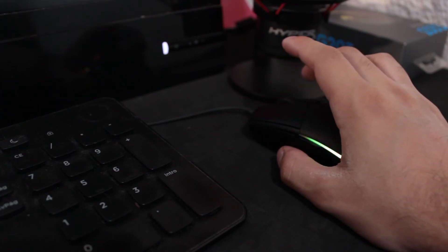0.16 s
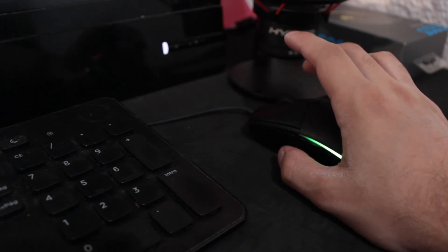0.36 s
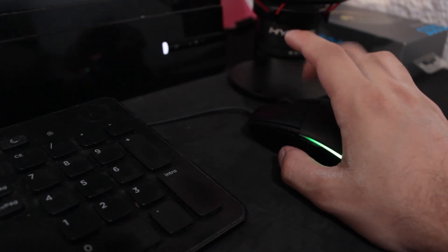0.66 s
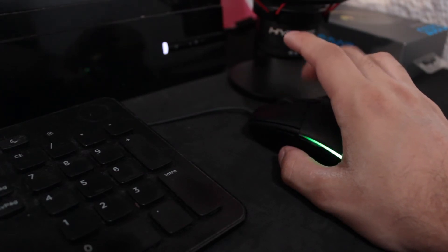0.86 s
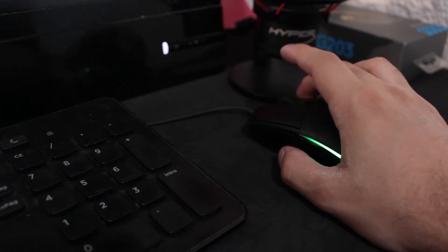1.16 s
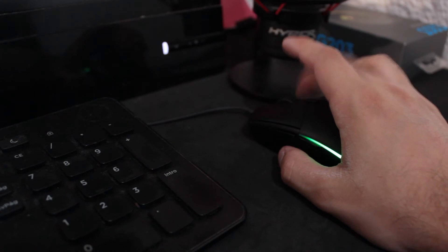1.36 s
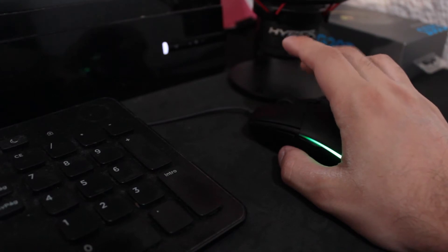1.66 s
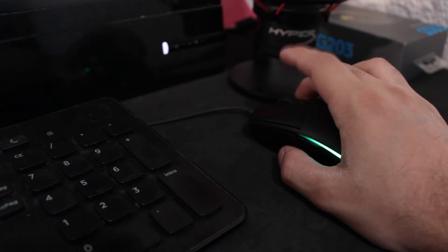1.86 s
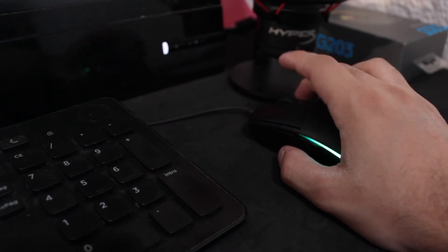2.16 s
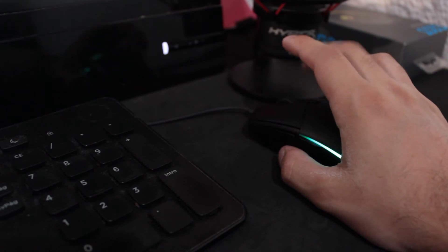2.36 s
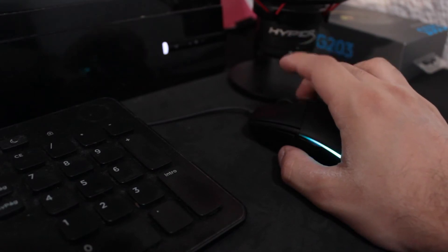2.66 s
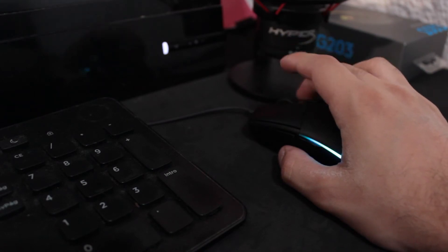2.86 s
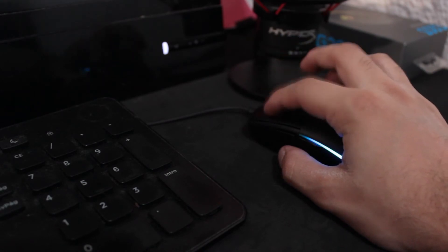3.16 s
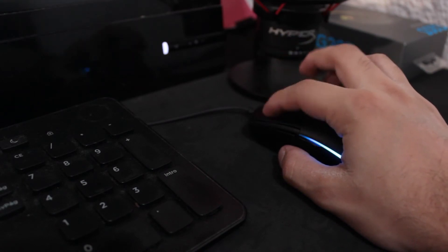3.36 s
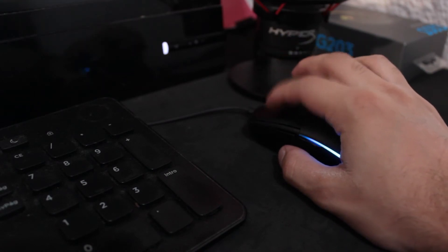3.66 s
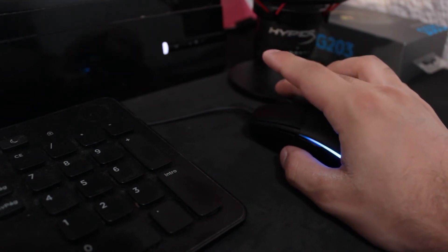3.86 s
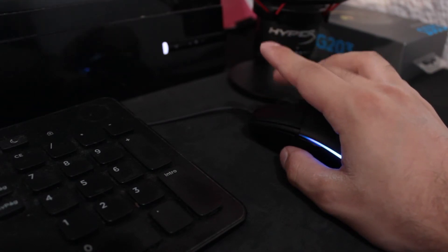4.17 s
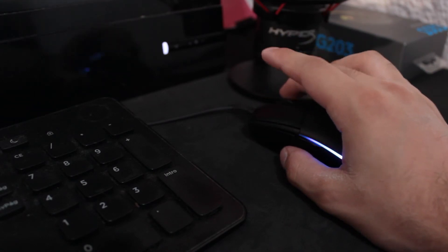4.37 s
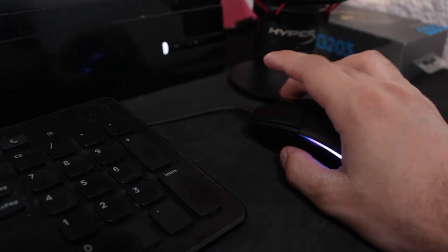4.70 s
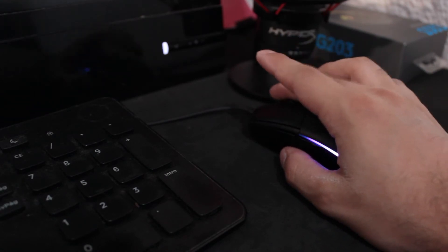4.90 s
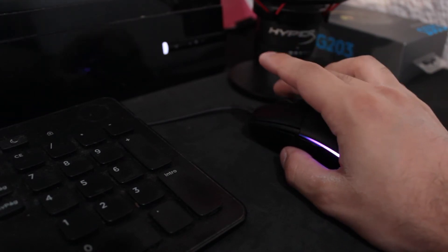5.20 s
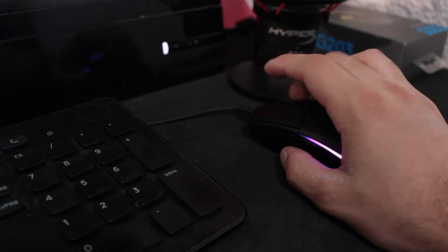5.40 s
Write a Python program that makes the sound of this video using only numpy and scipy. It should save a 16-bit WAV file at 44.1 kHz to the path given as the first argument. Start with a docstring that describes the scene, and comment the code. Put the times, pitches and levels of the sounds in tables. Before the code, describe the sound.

Computer fans give a faint, steady hum and hiss in a small room while a finger clicks a mouse on a desk, close to the microphone. Single crisp press-and-release clicks lead into a quicker run, the last three lighter and slightly different in tone. Then the clicking ends, leaving soft taps and slips of the hand on the mouse as a thin fan whine briefly swells.

```python
"""Mouse buttons tapped on a desk, first the right, then the left, close to a small microphone.
Each press snaps a spring switch and thumps the shell on the desk; each release lets the spring ring free.
The hand adds a few knocks, ticks and slips of skin. Behind it computer fans hum and hiss,
their whine flaring briefly near the end, and a small room answers the clicks."""
import sys
import numpy as np
from scipy import signal
from scipy.fft import rfft, irfft
from scipy.io import wavfile
from scipy.ndimage import uniform_filter1d

SR = 44100
rng = np.random.default_rng(int(sys.argv[2]) if len(sys.argv) > 2 else 0)


def to_wav(s):
    """Save 16-bit WAV."""
    ch = np.atleast_2d(s).T  # columns
    pcm = np.round(np.clip(ch, -1, 1) * 32767)  # PCM
    wavfile.write(sys.argv[1], SR, pcm.astype(np.int16))


N = 244303
LEFT_FROM_S = 3.1  # the finger moves to the left button

# contact noise of the right button: frequency_hz, density_db
RIGHT_CONTACT = [(710, -25), (1200, -8), (2550, -5.5), (3690, -1.5), (4910, -6.5), (7430, -3.5),
                 (8750, -13.5), (10100, -12.5), (13500, -26), (15300, -41), (16300, -46)]


def gain_of(db):
    """Decibels to amplitude."""
    return 10 ** (np.asarray(db) / 20)


def unit_rms(x):
    """Scales to rms 1."""
    return x / np.sqrt(np.mean(x ** 2) + 1e-20)


def unit_peak(x):
    """Scales to peak 1."""
    return x / abs(x).max()


def curve_at(points, hz):
    """Reads a table on a log-frequency axis."""
    point_hz, value = np.transpose(points)
    return np.interp(np.log(hz + 1), np.log(point_hz + 1), value)


def add(mix, start_s, sound):
    """Mixes a sound in at start_s, cutting what falls outside."""
    at = round(start_s * SR)
    sound = sound[max(-at, 0):]
    part = mix[max(at, 0):][:len(sound)]
    part += sound[:len(part)]


def ring(modes, length_s, rise_s):
    """One dying sine a mode, taking a moment to build; peak 1."""
    t = np.arange(round(length_s * SR)) / SR
    hz, db, t60 = np.transpose(modes)[:, :, None]
    sines = gain_of(db - 60 * t / t60) * np.sin(2 * np.pi * hz * t)
    return unit_peak(sines.sum(0) * (1 - np.exp(-t / rise_s)))


def coloured_noise(spectrum, size):
    """Noise with the given spectrum; rms 1."""
    hz = np.fft.rfftfreq(size, 1 / SR)
    return unit_rms(irfft(rfft(rng.standard_normal(size)) * gain_of(curve_at(spectrum, hz)), size))


def small_room(x, wet_db, thin_hz):
    """Direct sound, echoes off near surfaces, and a short tail that thins out below thin_hz."""
    # surfaces near the microphone: delay_s, level_db
    echoes = [(.0013, -11.5), (.0024, -6), (.0052, -15), (.0075, -21.5)]
    # decay of the room: frequency_hz, t60_s
    decay = [(250, .2), (660, .18), (1740, .18), (4590, .19), (12100, .14)]
    taps = np.zeros(SR // 2)
    at = np.arange(200, len(taps) - 16, 12)
    taps[at + rng.integers(0, 12, len(at))] = rng.choice([-1., 1.], len(at))
    hz, t, bands = signal.stft(taps, SR, nperseg=256)
    fade = gain_of(-60 * t / curve_at(decay, hz)[:, None])
    bass_loss = hz ** 2 / (hz ** 2 + thin_hz ** 2)
    tail = signal.istft(bands * fade * bass_loss[:, None], SR, nperseg=256)[1]
    tail *= 1 - np.exp(-np.arange(len(tail)) / SR / 0.0061)  # the tail builds up
    response = tail * gain_of(wet_db) / np.linalg.norm(tail)
    response[0] += 1  # direct sound
    for delay_s, db in echoes:
        add(response, delay_s, gain_of([db]))
    return signal.oaconvolve(x, response)[:len(x)]


def fan_tone(hz, db, width_hz):
    """A blade or motor tone: its wandering phase spreads it over width_hz, and its level drifts."""
    hop = 64
    wander, drift = rng.standard_normal((2, N // hop + 2))
    phase = np.cumsum(wander) * np.sqrt(2 * np.pi * width_hz * hop / SR)
    drift_db = 1.67 * unit_rms(uniform_filter1d(drift, size=60))
    phase, drift_db = (np.interp(np.arange(N) / hop, np.arange(len(c)), c) for c in (phase, drift_db))
    return np.sqrt(2) * gain_of(db + drift_db) * np.sin(2 * np.pi * hz * np.arange(N) / SR + phase)


def fan_whine():
    """The strongest fan tone, slowly swelling and sinking."""
    # course of the whine: time_s, level_db
    levels = [(0.0, -56), (0.55, -50.5), (1.1, -54.5), (2.4, -55), (3.8, -57), (5.09, -50.5), (5.54, -55)]
    level_db = np.interp(np.arange(N) / SR, *np.transpose(levels))
    return fan_tone(hz=835, db=level_db, width_hz=3.34)


def fans():
    """Computer fans in the background: air rushing in drifting patches, with blade and motor tones."""
    # rushing air: frequency_hz, density_db
    air = [(18, -50), (30, 0.5), (98, -12.5), (158, -14.5), (190, -50), (222, -7.5), (517, -12), (559, -5),
           (605, -8.5), (852, -9.5), (922, -11.5), (1110, -11.5), (1980, -19.5), (9630, -36), (16300, -51)]
    # blade and motor tones: pitch_hz, rms_db, width_hz
    hum = [(140.8, -61, 14.5), (163, -61, 10.1), (225.4, -52.5, 3.52), (255, -59, 9.76), (314.3, -61, 8.7),
           (556.3, -57.5, 6.48), (660, -63.5, 8.4), (1006, -78, 13), (1117, -62, 3.5), (1240, -63.5, 3.9),
           (1423, -66.5, 3.6), (1810, -78, 3.8), (1832, -65.5, 3.7), (2690, -64, 67.3), (3430, -69, 60),
           (4330, -73.5, 28.8), (4920, -77, 57.5), (6670, -77.5, 29), (9370, -75, 120)]
    frames, hz = N // 512 + 5, np.fft.rfftfreq(2048, 1 / SR)
    real, imag, patches = rng.standard_normal((frames, len(hz), 3)).T
    patches_db = unit_rms(uniform_filter1d(uniform_filter1d(patches, size=20, axis=0), size=6, axis=1))
    swell_db = .25 * unit_rms(uniform_filter1d(rng.standard_normal(frames), size=30))
    bands = (real + 1j * imag) * gain_of(curve_at(air, hz)[:, None] + patches_db + swell_db)
    rush = unit_rms(signal.istft(bands, nperseg=2048, noverlap=1536)[1][:N])
    return gain_of(-47) * rush + sum(fan_tone(*row) for row in hum)


def skin_rustle():
    """The hand shifts on shell and mat: each slip swells and dies in fine, uneven grains."""
    # slips of the hand: peak_s, level_db
    slips = [(4.11, -64), (4.81, -51), (5.03, -50), (5.19, -48), (5.45, -47.5)]
    # skin friction: frequency_hz, density_db
    friction = [(250, -30), (500, -3), (900, 4), (1800, -9.5), (4000, -14), (8000, -29), (13000, -34),
                (16000, -50)]
    fade_db_per_s = 155
    t = np.arange(N) / SR
    envelope = sum(gain_of(db - fade_db_per_s * abs(t - peak_s)) for peak_s, db in slips)
    grains = gain_of(4.1 * unit_rms(uniform_filter1d(rng.standard_normal(N), size=250)))
    return envelope * unit_rms(grains * coloured_noise(friction, N))


def knocks_and_flares():
    """Hand knocks and ticks, and brief flares of the fan whine: each a pitch with two weaker neighbours."""
    # soft knocks and brief flares of the fan whine: start_s, level_db, pitch_hz, t60_s
    short_rings = [(1.795, -26, 1170, 0.02), (4.112, -32, 830, 0.011), (4.811, -37, 680, 0.046),
                   (5.008, -31.5, 830, 0.035), (5.034, -31, 810, 0.014), (5.167, -35, 845, 0.071),
                   (5.201, -35.5, 890, 0.027), (5.444, -35, 584, 0.024)]
    # faint ticks: start_s, level_db, pitch_hz
    ticks = [(1.797, -33.5, 3620), (4.113, -37, 2620), (4.992, -43, 6860), (5.021, -49, 7060),
             (5.182, -52, 11800), (5.44, -54, 11600)]
    out = np.zeros(N)
    for start_s, db, hz, t60 in short_rings:
        modes = [(hz, 0, t60), (1.41 * hz, -5, t60 / 2), (0.77 * hz, -5, t60 / 2)]
        add(out, start_s, gain_of(db) * ring(modes, length_s=.08, rise_s=0.00023))
    for start_s, db, hz in ticks:
        modes = [(hz, 0, .006), (1.2 * hz, -4, .004), (.8 * hz, -5, .004)]
        add(out, start_s, gain_of(db) * ring(modes, length_s=.02, rise_s=0.00024))
    return small_room(out, wet_db=-5, thin_hz=300)


def desk_ring():
    """Desk and nook ring on after a thump; each blow wakes the modes by different amounts."""
    # modes of desk and nook: pitch_hz, level_db, t60_s
    desk_modes = [(126, -3, .07), (143, -11, .15), (404, -4, .13), (445, -14, .13), (520, -16, .1),
                  (625, -13, .13), (657, -8, .14), (745, -13, .14), (823, -5.5, .19), (897, -6.5, .18),
                  (990, -12, .12), (1090, -20, .15), (1335, -14, .15), (1518, -7, .11), (1650, -9, .07),
                  (1773, -11, .17), (1835, -13, .2), (1904, -9, .2), (2020, -10, .1), (2150, -2, .1),
                  (2299, -5, .16), (2428, -9, .16), (2523, -12, .18), (2570, -12, .18), (2741, -9, .13),
                  (2925, -12, .11), (3025, -13, .12), (3355, -11, .13), (3467, -10, .14)]
    struck = np.array(desk_modes)
    struck[:, 1] += 1.2 * rng.standard_normal(len(struck))
    return ring(struck, length_s=.4, rise_s=0.0051)


def late_ring():
    """A short ring that swells after the thump and glides upward."""
    t = np.arange(2600) / SR
    hz = 815 + 175 * (1 - np.exp(-t / 0.015))
    return unit_peak(np.sin(2 * np.pi * np.cumsum(hz) / SR) * t * np.exp(-t / 0.0078))


def shell_thump(left, pitch_factor):
    """The hollow plastic shell bottoms out, then bounces once on the desk."""
    # shell modes under each button: pitch_hz, level_db, t60_s
    right_shell = [(459, -5, 0.016), (620, 5, 0.012), (825, -1.5, 0.012), (1466, -3.5, 0.015),
                   (1920, 5, 0.0088), (2293, -0.5, 0.015), (2790, -0.5, 0.0092), (3372, -8.5, 0.018),
                   (4200, -13, 0.015)]
    left_shell = [(466, -5.5, 0.022), (588, 1.5, 0.026), (814, -6.5, 0.027), (1120, -1, 0.035),
                  (2100, -8, 0.0099), (2326, 1.5, .016), (3370, -10.5, 0.043), (4450, -8, 0.015)]
    bounce_s, bounce_db = .0047, -1.5
    modes = [(hz * pitch_factor, db, t60) for hz, db, t60 in (left_shell if left else right_shell)]
    thump = ring(modes, length_s=.1, rise_s=0.00063)
    add(thump, bounce_s, gain_of(bounce_db) * thump)
    return thump


def fingertip():
    """A brief brush of noise as the fingertip meets the button, before the switch gives."""
    swell = np.sin(np.pi * np.arange(256) / 256)
    return unit_peak(coloured_noise(RIGHT_CONTACT, 256) * swell)


def plastic_crack(left, rise_s):
    """A few milliseconds of hard plastic contact noise, so dense that no pitch stands out."""
    # contact noise of the left button: frequency_hz, density_db
    left_contact = [(1470, -28), (2500, -3.5), (4500, -1), (5970, -0.5), (7100, -1.5), (8710, -10.5),
                    (10300, -2), (11800, -15), (13800, -33), (16300, -45)]
    colour_db = curve_at(left_contact if left else RIGHT_CONTACT, np.fft.rfftfreq(512, 1 / SR))
    age = np.arange(512) / SR / rise_s
    burst = rfft(rng.standard_normal(512) * age ** 2 * np.exp(-age))
    spectrum = burst / abs(burst) ** 1.6 * gain_of(colour_db)  # chance peaks are pressed down
    return unit_peak(irfft(spectrum) * (1 - np.exp(-age)) * np.exp(-age / 6))


def spring_snap(left, damping, build_cycles):
    """The spring jumps over and rings; each mode needs some cycles to build, so low ones peak later."""
    # spring modes of each switch: pitch_hz, base_width_hz, spectral_peak_db
    right_spring = [(3430, 210, 0), (4300, 300, -11), (5260, 330, -3), (6000, 150, -11), (7245, 170, -3),
                    (8370, 220, -10), (10310, 170, -11), (11600, 200, -13), (12400, 400, -18),
                    (13650, 280, -13.5), (14850, 300, -24)]
    left_spring = [(1940, 200, -16), (3325, 130, 1), (4250, 300, -11), (5250, 170, -3), (6670, 180, 0),
                   (7050, 250, -8), (8750, 400, -10), (10080, 320, -7), (11900, 150, -10), (13550, 280, -7),
                   (14900, 180, -18)]
    modes = left_spring if left else right_spring
    t = np.arange(3072) / SR
    hz, width, db = np.transpose(modes)[:, :, None]
    detune, louder, phase = rng.standard_normal((len(modes), 3)).T[:, :, None]
    strength = width * gain_of(db + 1.8 * louder)
    build = (1 - np.exp(-t * hz / build_cycles)) ** 2
    fade = np.exp(-np.pi * width * damping * t)
    sines = np.sin(2 * np.pi * hz * (1 + .003 * detune) * t + 9 * phase)
    return unit_peak((strength * build * fade * sines).sum(0))


def switch_click(left, crack_db, spring_db, damping, build_cycles, rise_s):
    """One throw of a switch: the plastic cracks and the spring rings."""
    out = np.zeros(4096)
    add(out, 0, gain_of(crack_db) * plastic_crack(left, rise_s))
    add(out, 0, gain_of(spring_db) * spring_snap(left, damping, build_cycles))
    return out


def mouse():
    """The mouse, close up: a press damps the spring and thumps the desk; a release lets it ring free."""
    # button presses: start_s, click_db, thump_db, shell_pitch_factor
    presses = [(0.763, -13.5, -14, 1.04), (1.1473, -20, -33.5, 1.05), (1.4387, -8, -11, 1.03),
               (1.9, -11.5, -13, 1.02), (2.175, -8, -8.5, 1.07), (2.4816, -12, -13.5, 1),
               (2.6792, -15, -16.5, 1.01), (2.858, -16, -21.5, 0.995), (3.2328, -18, -36, 1),
               (3.424, -19.5, -37, 0.93), (3.6183, -16, -19.5, 0.96)]
    # button releases: start_s, click_db
    releases = [(-0.0032, -19.5), (0.8368, -20), (1.1514, -17.5), (1.5239, -19), (1.9728, -19.5),
                (2.2522, -19), (2.5447, -19.5), (2.7373, -19.5), (2.9487, -20.5), (3.3019, -18.5),
                (3.487, -18), (3.7017, -18)]
    touch_db, desk_db, late_db = -28.5, -7.5, -8  # relative to click, thump and desk ring
    lead = SR // 10  # the first release falls just before the start
    downs, ups, thumps, desk = np.zeros((4, N + lead))
    for start_s, click_db, thump_db, pitch_factor in presses:
        left = start_s > LEFT_FROM_S
        at_s = start_s + lead / SR
        click = switch_click(left, crack_db=-0.48, spring_db=-8, damping=4.5,
                             build_cycles=1.5, rise_s=.0007)
        add(downs, at_s, gain_of(click_db) * click)
        add(downs, at_s - .0045, gain_of(click_db + touch_db) * fingertip())
        add(thumps, at_s + .0008, gain_of(thump_db) * shell_thump(left, pitch_factor))
        add(desk, at_s + .001012, gain_of(thump_db + desk_db) * desk_ring())
        if not left:
            add(desk, at_s + .01, gain_of(thump_db + desk_db + late_db) * late_ring())
    for start_s, click_db in releases:
        left = start_s > LEFT_FROM_S
        click = switch_click(left, crack_db=-8, spring_db=-0.3, damping=0.87,
                             build_cycles=2, rise_s=.0011)
        add(ups, start_s + lead / SR, gain_of(click_db) * click)
    downs = small_room(downs, wet_db=-5, thin_hz=270)
    ups = small_room(ups, wet_db=-6, thin_hz=300)
    thumps = small_room(thumps, wet_db=-6, thin_hz=600)
    return (downs + ups + thumps + desk)[lead:]


def scene():
    """Mouse and hand in front, fans behind, in mono."""
    whine = fan_whine()
    return (mouse() + knocks_and_flares() + skin_rustle() + fans() + whine)[None]


def record(dry):
    """The small microphone loses deep bass and top treble; a steep band limit follows."""
    bass_cut_hz, treble_cut_hz, band_limit_hz = 118, 15300, 16400
    thin = signal.sosfilt(signal.butter(2, bass_cut_hz, "high", fs=SR, output="sos"), dry)
    soft = signal.sosfilt(signal.butter(6, treble_cut_hz, fs=SR, output="sos"), thin)
    band_limit = signal.firwin(511, band_limit_hz, window=("kaiser", 9), fs=SR)
    return signal.oaconvolve(soft, band_limit[None], "same")


dry = scene()
out = record(dry)
to_wav(out)
```